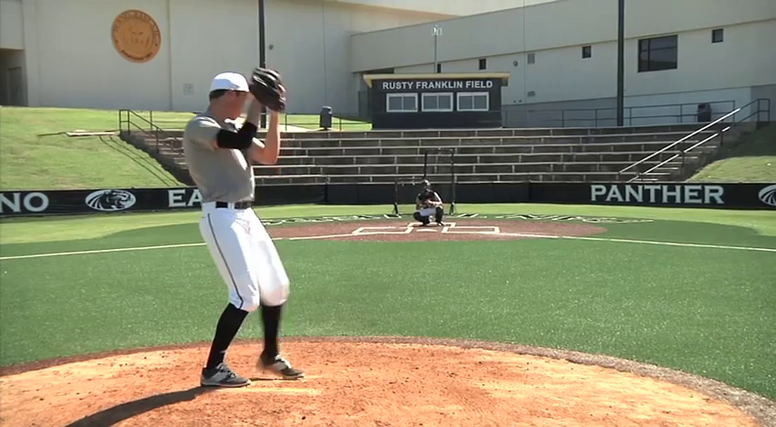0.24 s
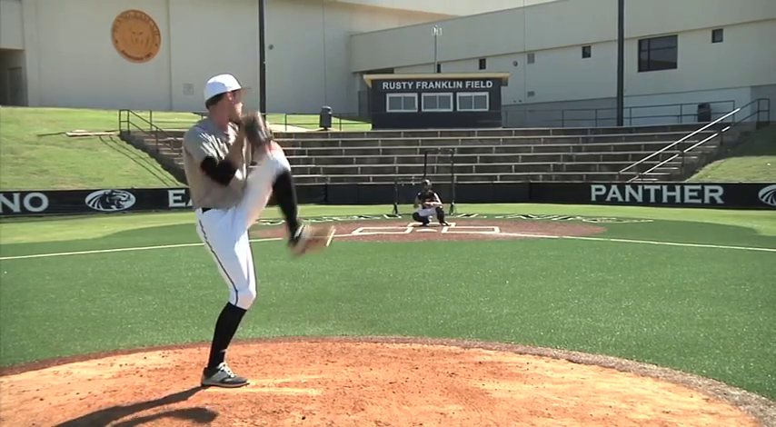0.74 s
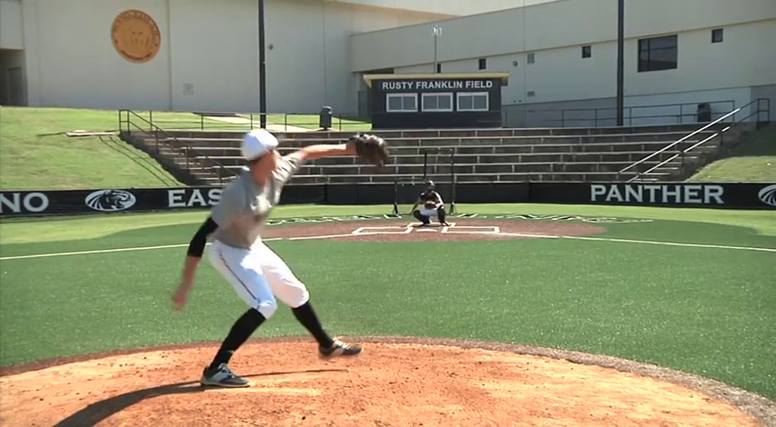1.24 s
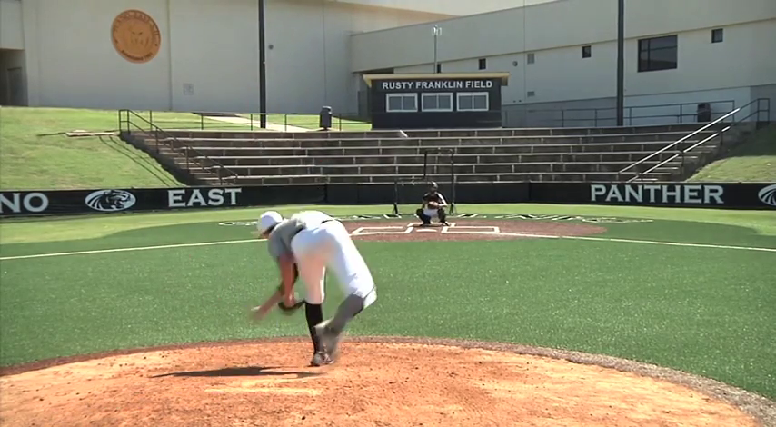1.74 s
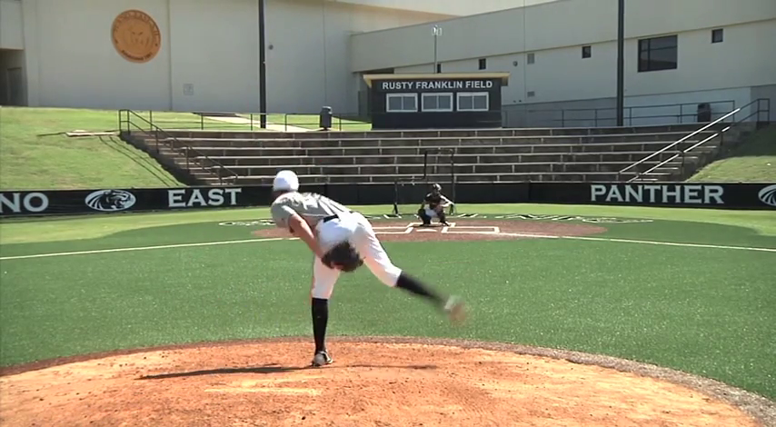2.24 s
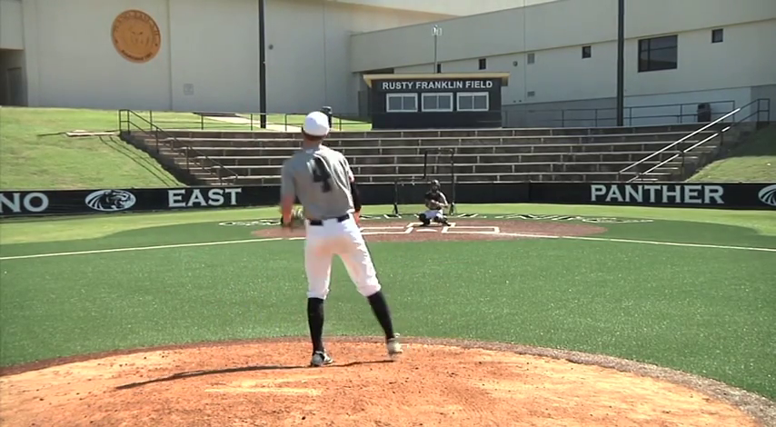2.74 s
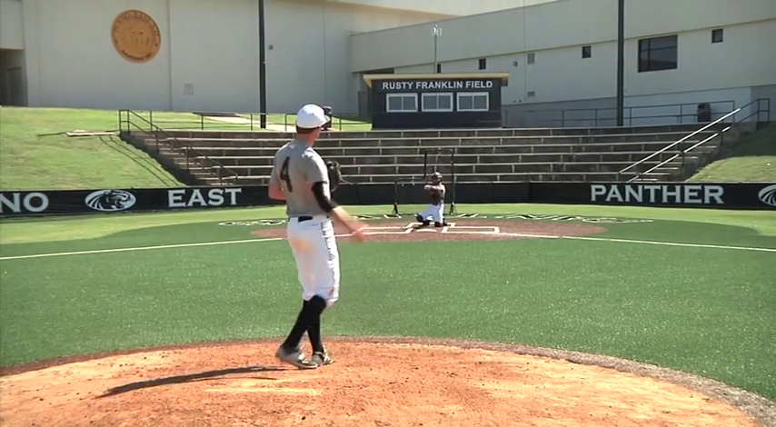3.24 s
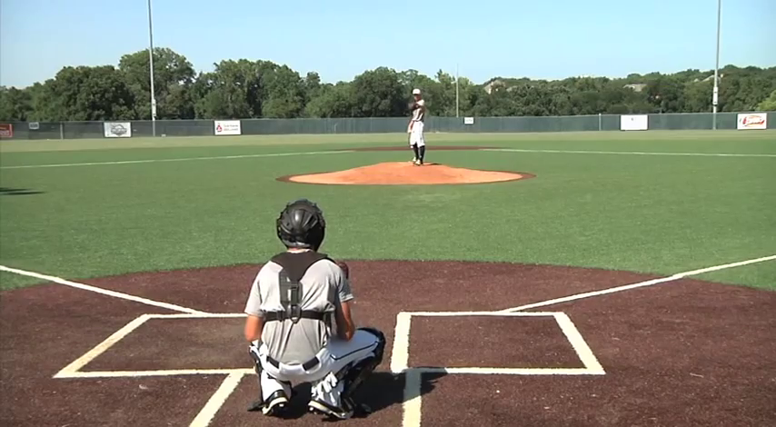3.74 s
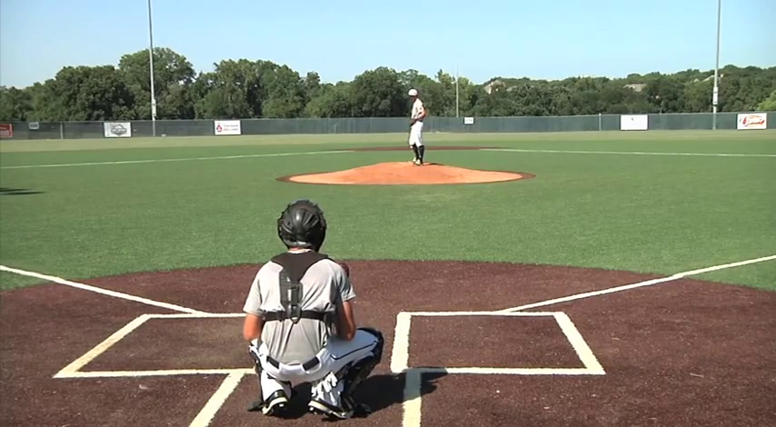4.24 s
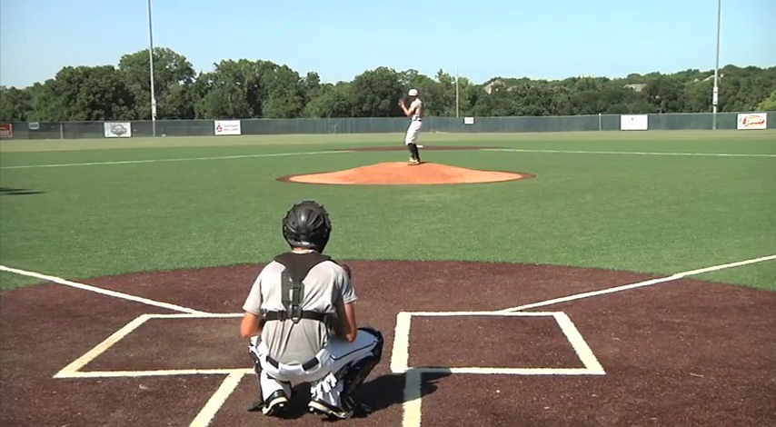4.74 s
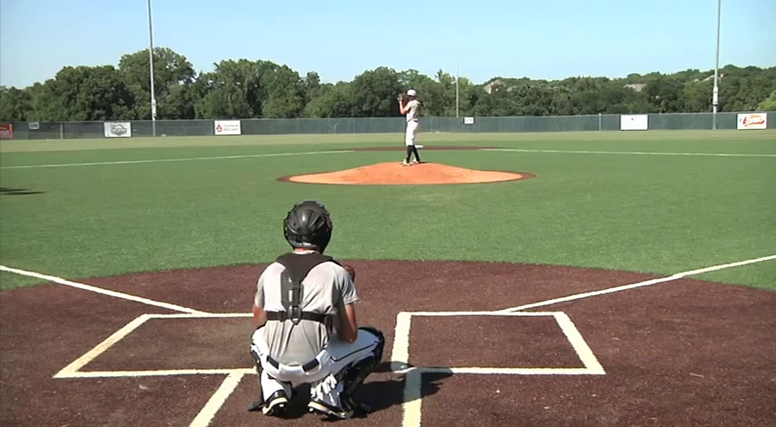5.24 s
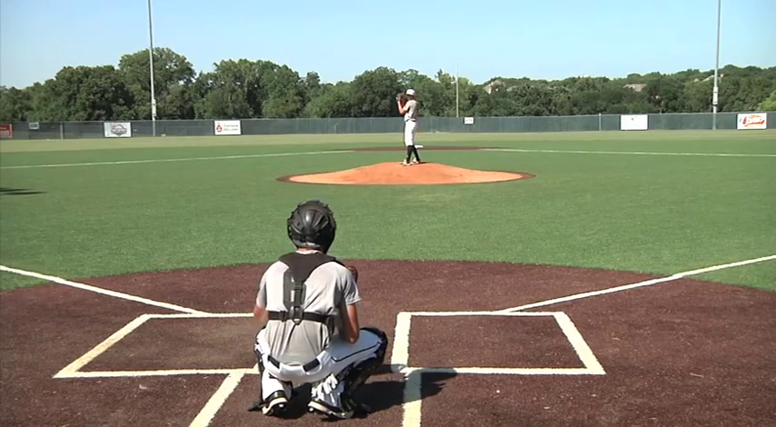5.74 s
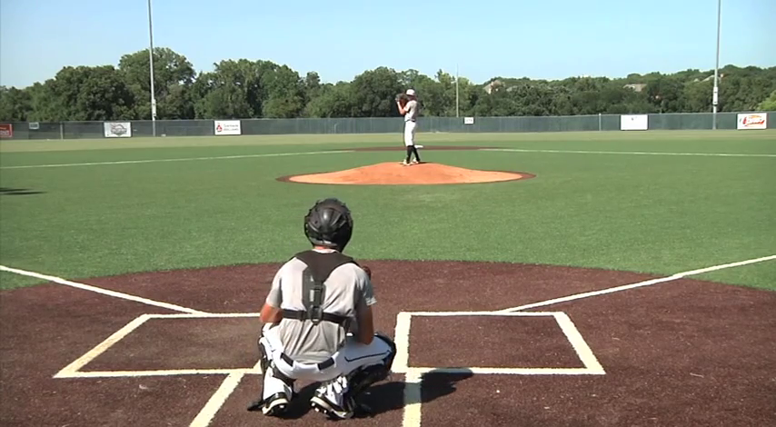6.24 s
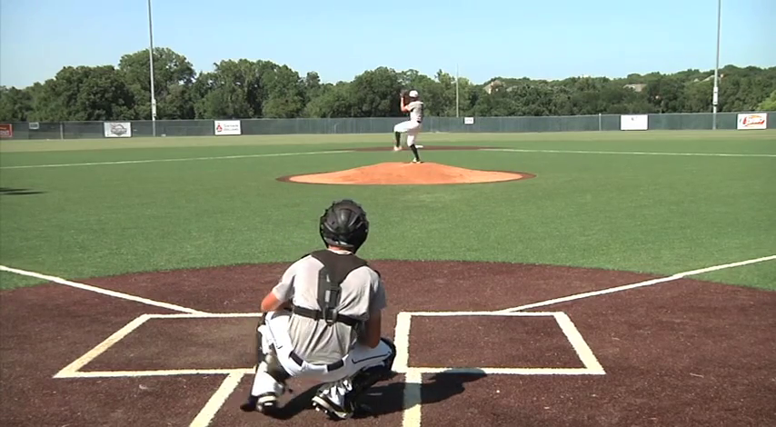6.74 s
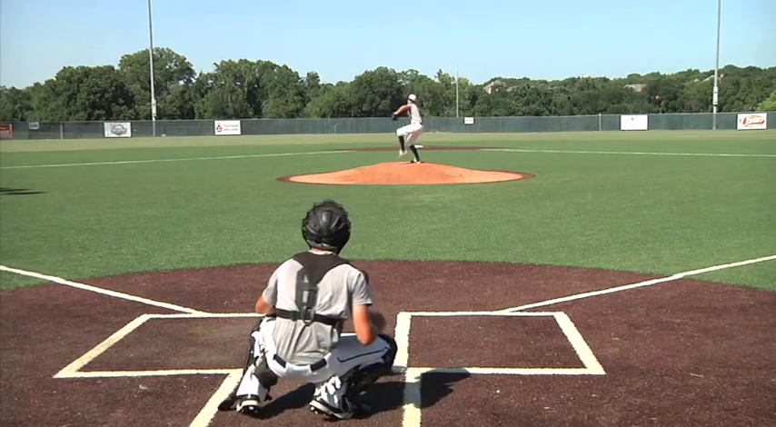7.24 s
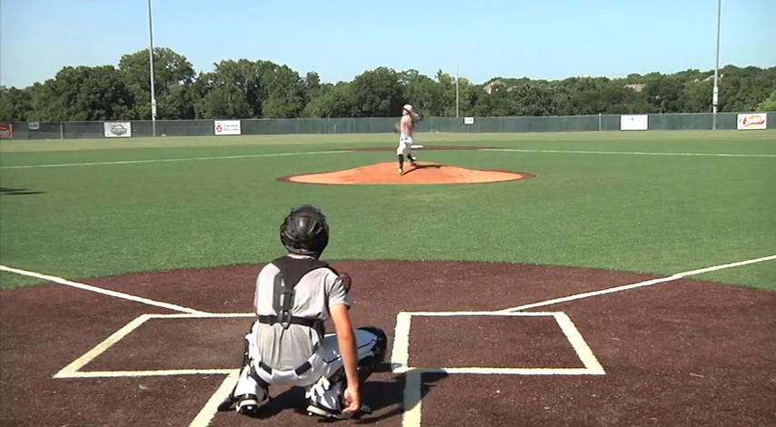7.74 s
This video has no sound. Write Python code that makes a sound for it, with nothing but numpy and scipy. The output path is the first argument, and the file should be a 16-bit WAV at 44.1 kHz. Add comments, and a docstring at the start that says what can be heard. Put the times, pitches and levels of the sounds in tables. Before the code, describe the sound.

Wind rumbles and flutters against the microphone with small dry ticks over a thin, faintly whining outdoor wash. A pitcher's shoes grit and thud on clay, then a hard leather pop rings out with quick slap echoes and a short fading tail. More gritty scraping precedes a click and sudden change of place. Behind the plate there is a soft droning distant wash, a calm spell, then renewed gusts and fine gear scuffs. Nearly mono.

```python
"""Gusty wind buffets a microphone at a ball field: shaped noise held to a limit, with short dry crackles.
Behind the mound: a wash with thin tones, cleats and feet on clay as grains, and a far bird's sliding whistle.
The ball pops into the catcher's mitt, a noise crack over a falling thump; wall, bleachers and building echo it.
A click jumps the sound to behind the plate: a wash of distant traffic and trees with a drone,
more gusts, and showers of finer grains as the catcher's gear scuffs."""
import sys
import numpy as np
from scipy import signal
from scipy.fft import rfft, irfft, next_fast_len
from scipy.io import wavfile
from scipy.ndimage import uniform_filter1d

SR = 44100
rng = np.random.default_rng(int(sys.argv[2]) if len(sys.argv) > 2 else 0)


def int16_out(signal):
    """Quantize to a 16-bit WAV file."""
    q = np.round(np.clip(np.atleast_2d(signal).T, -1, 1) * 32767)
    wavfile.write(sys.argv[1], SR, q.astype(np.int16))


N = 351918
T = np.arange(N) / SR  # s

# short dry crackles and sharp ticks amid the wind: [t/s, length/s, level/dB before colouring]
CRACKLES = [(.015, .014, -51), (.034, 0.013, -49.5), (0.054, .03, -59), (0.092, .0006, -40),
            (0.132, 0.0056, -49.5), (.151, .018, -51.5), (0.374, .017, -49.5), (0.4, 0.0068, -54),
            (.4235, .0006, -40), (.562, 0.0061, -47), (.738, .007, -51), (.854, .004, -48.5),
            (0.989, 0.0057, -46.5), (1.0057, .0006, -39), (1.034, .003, -51), (1.102, .006, -54.5),
            (1.438, .006, -55), (1.641, .004, -55), (1.837, .003, -49), (2.493, .004, -53),
            (2.5, 0.0054, -47), (2.664, .005, -47), (2.7724, .01, -52), (2.815, 0.014, -50),
            (2.872, 0.013, -49), (3.042, .007, -49), (3.234, .004, -54), (3.3717, .004, -47.5),
            (7.8447, .005, -53), (7.9443, 0.0062, -49)]
WIND_LIMIT, CEILING = .39, .48  # limits of the wind pressure and of the whole sound, full scale = 1
MOVE_S = 3.443  # from the mound to the plate


def amp(db):
    """Decibels to gain."""
    return 10 ** (np.asarray(db) / 20)


def unit(x):
    """Scales to an rms of one."""
    return x / np.sqrt(np.mean(x ** 2) + 1e-20)


def read(points, hz):
    """Reads a spectrum along log frequency."""
    f, value = np.transpose(points)
    return np.interp(np.log(hz + 1), np.log(f + 1), value)


def add(mix, s, sound):
    """Mixes a sound in at a time, cut off at the end of the mix."""
    part = mix[round(s * SR):][:len(sound)]
    part += sound[:len(part)]


def colour(x, spectrum, tilt_db=0):
    """Filters a signal by a spectrum, tilted by about so many dB an octave."""
    hz = np.fft.rfftfreq(len(x), 1 / SR)
    gain_db = read(spectrum, hz) + tilt_db * np.log2(hz / 1000 + .1)
    return irfft(rfft(x) * amp(gain_db), len(x))


def noise(spectrum, peaks=(), width_hz=14):
    """Steady noise of a given spectrum, with narrow resonances if any, rms one."""
    size = next_fast_len(N)
    hz = np.fft.rfftfreq(size, 1 / SR)
    db = read(spectrum, hz)
    for centre, rise in peaks:
        db = db + rise / (1 + ((hz - centre) / width_hz) ** 2)
    return unit(irfft(rfft(rng.standard_normal(size)) * amp(db), size)[:N])


def steadied(x, seconds):
    """Evens out the slow swells of a noise."""
    power = abs(uniform_filter1d(x ** 2, int(seconds * SR) + 1))
    return x / np.sqrt(power + 1e-6)


def flatten(x, ceiling):
    """Rounds peaks off against a ceiling."""
    return x / (1 + (x / ceiling) ** 20) ** (1 / 20)


def wind(buffet_db=4.0, eddies_db=1.5, lump_db=1.5):
    """Large slow eddies push on the microphone; small ones flutter above them; both come in lumps."""
    # wind on the microphone: [t/s, buffeting level/dB, small-eddy level/dB], both before trim
    gusts = [(0, -13, -28.5), (0.24, -22, -47.5), (0.36, -17, -33.5), (0.5, -19.5, -38), (0.8, -18.5, -26),
             (1.55, -20.5, -26), (2.12, -20.5, -28), (2.28, -28, -36), (2.43, -30, -39), (2.5, -20, -30.5),
             (2.6, -24, -38), (2.8, -18, -31.5), (3.0, -21.5, -31.5), (3.4, -21, -24.5),
             (3.52, -22.5, -39.5), (3.69, -20.5, -36.5), (3.8, -28.5, -47), (4.03, -27.5, -47),
             (4.13, -22, -44), (4.4, -31, -43), (4.53, -27, -49), (4.64, -22, -45), (4.78, -34.5, -47),
             (5.05, -39.5, -46), (5.4, -36.5, -47.5), (5.7, -41.5, -46.5), (6.38, -40, -46.5),
             (6.67, -27, -30.5), (6.76, -30, -38.5), (7.05, -29.5, -49), (7.22, -29, -42),
             (7.31, -21, -35.5), (7.45, -25, -35.5), (7.98, -19, -36)]
    # spectrum of the large eddies: [f/Hz, relative level/dB per Hz]
    buffet = [(3, -8.5), (10, 3.5), (28, -1), (50, -8.5), (70, -23), (100, -25), (160, -41), (400, -79),
              (1500, -120)]
    # spectrum of the small eddies: [f/Hz, relative level/dB per Hz]
    eddies = [(30, -23), (60, 5.5), (80, -2), (120, -6), (160, -12), (240, -20), (400, -34), (1000, -51.5),
              (4000, -103.5)]
    # how the wind comes in lumps: [swell rate/Hz, relative level/dB]
    lumps = [(1, -18), (4, -0.5), (9, -0.5), (25, -38), (100, -120)]
    s, push_db, flutter_db = np.transpose(gusts)
    push = steadied(noise(buffet), 0.135) * amp(np.interp(T, s, push_db) + buffet_db)
    flutter = steadied(noise(eddies), .12) * amp(np.interp(T, s, flutter_db) + eddies_db)
    return (push + flutter) * amp(lump_db * noise(lumps))


def shoved(pressure, shove_s=0.0069, shove_share=.7):
    """At each crackle the wind pressure is pushed to its limit, on whichever side of zero it already is."""
    for s, length, _ in CRACKLES:
        middle = s + length / 2
        grip = min(shove_share, 1) * np.exp(-np.minimum(((T - middle) / shove_s) ** 2, 50))
        target = np.copysign(CEILING, np.interp(middle, T, pressure))
        pressure = pressure + grip * (target - pressure)
    return flatten(pressure, WIND_LIMIT)


def ticks(pressure, crackle_db=0.0, grain_db=4, fade_db=-9, ticks_per_s=200, tick_db=-42):
    """Each crackle is dry and short; random ticks come more often the harder the wind pushes."""
    # spectrum of ticks and crackles: [f/Hz, gain/dB]
    tick_colour = [(300, -4), (2200, 6), (8000, -4), (16000, -6.5)]
    chance = ticks_per_s * (pressure / WIND_LIMIT) ** 2 / SR  # per sample
    out = amp(tick_db) * rng.standard_normal(N) * (rng.random(N) < chance)
    t = T[:SR // 20]
    for s, length, db in CRACKLES:
        grains = rng.standard_normal(len(t)) * amp(grain_db * np.minimum(rng.exponential(1, len(t)), 4))
        burst = grains * amp(fade_db * t / length) * np.clip(2 - 2 * t / length, 0, 1)
        add(out, s, amp(crackle_db + db) * burst * np.sqrt(length * SR) / np.linalg.norm(burst))
    return colour(out, tick_colour)


def mound_air(mound_db=2.5):
    """Open air behind the mound: an uneven distant wash, with faint ringing bands."""
    # level of the wash: [t/s, level/dB before trim]
    mound_level = [(0, -45), (.08, -53.5), (.22, -53), (.3, -51), (.8, -49.5), (1.12, -55.5), (1.42, -44.5),
                   (1.63, -46), (1.75, -44), (1.85, -47), (1.95, -44.5), (2.25, -44), (2.53, -48),
                   (2.62, -45), (2.9, -52), (3.43, -45.5)]
    # spectrum of the wash: [f/Hz, relative level/dB per Hz]
    mound_spectrum = [(150, -5), (280, -2.5), (520, -1.5), (800, -5.5), (1150, -8.5), (1500, -12),
                      (1850, -16.5), (2400, -17.5), (3000, -17), (3600, -20.5), (4600, -26.5),
                      (7600, -32.5), (9500, -43.5), (16000, -62)]
    # faint ringing bands in the air by the building: [f/Hz, rise above the wash/dB]
    whine = [(528, 3.5), (1066, 4), (1755, 8), (1814, 5.5), (2105, 9.5), (2283, 2), (2401, 11), (2869, 9),
             (3101, 9.5), (3219, 7), (3510, 6), (3569, 9)]
    level = amp(mound_db) * amp(np.interp(T, *np.transpose(mound_level)))
    return (T < MOVE_S) * noise(mound_spectrum, whine, width_hz=7.8) * level


def hum(waver_share=.0007):
    """Thin, slightly wavering tones heard only on the mound."""
    # clean tones by the building: [f/Hz, rms level/dB]
    tones = [(528, -62.5), (1066, -69), (3101, -79.5), (3510, -75), (3569, -73.5)]
    drift = noise([(1, 0), (5, -6), (20, -40), (80, -120)])
    clock = np.cumsum(1 + waver_share * drift) / SR  # s, running a little fast and slow
    total = sum(amp(db) * np.sqrt(2) * np.sin(2 * np.pi * hz * clock) for hz, db in tones)
    return (T < MOVE_S) * total


def scrape(length, db, tilt_db, spectrum, grain_db, clump_db, clump_s=0.0027, peak_share=0.29):
    """A clumped shower of tiny grains that swells and fades."""
    t = T[:SR // 2]
    clumps = unit(uniform_filter1d(rng.standard_normal(len(t)), int(clump_s * SR) + 1))
    grain_level = amp(grain_db * np.minimum(rng.exponential(1, len(t)), 4) + clump_db * clumps)
    grains = rng.standard_normal(len(t)) * grain_level
    stroke = np.interp(t / length, [0, min(peak_share, .9), 1], [0, 1, 0]) ** .65
    return amp(db) * steadied(unit(colour(grains, spectrum, tilt_db)), length) * stroke


def cleats():
    """The pitcher's cleats scrape coarse grains of clay."""
    # scrapes: [t/s, length/s, level/dB before the swell, brightness/dB an octave]
    scrapes = [(0.261, .09, -53.5, 0.5), (1.407, 0.0061, -42, 1), (1.511, .005, -45, 6),
               (1.518, .005, -41, 5), (1.521, 0.04, -42.5, 4), (1.549, 0.011, -35, 1),
               (1.545, 0.076, -38.5, 4), (1.66, 0.037, -48, 5), (1.681, 0.095, -49, 3),
               (1.73, .006, -41, 3), (3.285, 0.0038, -32.5, -5.5), (3.291, 0.0054, -31.5, -5),
               (3.295, 0.061, -48.5, -5), (3.324, 0.027, -39.5, -8)]
    # spectrum of the clay grains: [f/Hz, relative level/dB per Hz]
    grit = [(200, -37), (700, 4.5), (1500, 9), (3000, 3), (4500, -5.5), (7700, -14.5), (9500, -24),
            (12000, -41), (16000, -60)]
    out = np.zeros(N)
    for s, *stroke in scrapes:
        add(out, s, scrape(*stroke, grit, grain_db=8, clump_db=2.5))
    return out


def bird(waver_hz=30, rise_s=0.046, fade_db=-12, drop_hz=419, settle_s=.075):
    """A far bird's thin whistle swells, sinks to its closing pitch and fades."""
    # whistles: [t/s, length/s, closing pitch f/Hz, peak level/dB before the fade]
    whistles = [(1.073, 0.21, 6530, -72), (2.70, 0.35, 6660, -65)]
    out = np.zeros(N)
    for s, length, hz, db in whistles:
        t = T[:int(length * SR)]
        waver = waver_hz * noise([(1, -3), (80, -17.0), (400, -38.5)])[:len(t)]
        pitch = hz + drop_hz * np.exp(-t / settle_s) + waver
        ends = np.minimum(np.minimum(t, length - t) / rise_s, 1)
        level = amp(db + fade_db * (t / length) ** 2) * ends
        add(out, s, level * np.sin(2 * np.pi * np.cumsum(pitch) / SR))
    return out


def steps(step_t60=0.044, step_rise_s=0.0012):
    """Feet land on the clay, each a short dull crunch of noise dying away."""
    # footfalls: [t/s, level/dB before rise and decay]
    footfalls = [(1.539, -23), (1.552, -26), (1.66, -25.5)]
    # spectrum of the crunch: [f/Hz, relative level/dB per Hz]
    clay = [(150, -1), (350, 1), (700, 4), (1020, 0), (1400, -20), (3000, -22), (8000, -42)]
    out, t = np.zeros(N), T[:SR // 2]
    for s, db in footfalls:
        press = amp(db - 60 * t / step_t60) * (1 - np.exp(-t / step_rise_s))
        crunch = unit(colour(rng.standard_normal(len(t)), clay))
        add(out, s, press * steadied(crunch, step_t60 / 2))
    return out


def pop(pocket_db=-3.5, pocket_s=0.0045, crack_t60=0.011, rise_s=0.00028, damping_s=0.0057):
    """The ball slaps the leather: a dry crack over a thump that drops in pitch as the pocket gives."""
    # leather on leather: [f/Hz, gain/dB]
    crack_colour = [(300, -6), (1100, 4), (1350, 12), (1900, 15), (2600, 18.5), (3350, 19.5), (3900, 1),
                    (4400, 9.5), (5500, 2.5), (7300, 3.5), (10000, -4), (13500, -18), (16000, -21)]
    # the mitt's pocket: [f/Hz, gain/dB]
    pocket_colour = [(120, -2), (250, 5), (440, -7.5), (600, -3.5), (800, 4.5), (1100, -4.5), (2000, -8)]
    taut_hz, slack_hz, give_s = 869, 226, 0.0024
    t = T[:SR // 20]
    hz = slack_hz + (taut_hz - slack_hz) * np.exp(-t / give_s)
    pocket = amp(pocket_db) * np.exp(-(t / pocket_s) ** 2) * np.sin(2 * np.pi * np.cumsum(hz) / SR)
    burst = rng.standard_normal(len(t)) * amp(-60 * t / crack_t60) * (1 - np.exp(-t / rise_s))
    even = irfft(np.exp(1j * np.angle(rfft(burst))), len(t))  # same strength at every frequency
    crack = colour(even, crack_colour) * np.exp(-(t / damping_s) ** 2)  # the hand damps the leather at once
    return crack + colour(pocket, pocket_colour) * np.cos(np.pi / 2 * t / t[-1]) ** 2


def smeared(envelope):
    """The pop scattered by many small surfaces, spread over an envelope."""
    scatter = rng.standard_normal(len(envelope)) * envelope
    return signal.fftconvolve(pop(), scatter / np.linalg.norm(scatter))


def field_tail():
    """Scatter from the whole ground; each band dies at its own rate, the bass slowest."""
    # decay over the field: [f/Hz, time to fall 60 dB/s]
    field_t60 = [(150, 1), (600, 0.64), (3000, 0.44), (8000, 0.8), (16000, 0.33)]
    hz, t, z = signal.stft(rng.standard_normal(SR), SR, nperseg=256)
    decay = amp(-60 * t / read(field_t60, hz)[:, None])
    tail = signal.istft(z * decay, SR, nperseg=256)[1]
    return tail / np.linalg.norm(tail)


def catch(pop_db=0.0, tail_db=-14.0, scatter_t60=0.013, wall_db=0.0):
    """The pop, two hard wall slaps and a boom, a flutter off the bleachers, a building smear and a faint tail."""
    # echoes off the backstop wall: [t/s, level/dB before colouring, top edge f/Hz]
    wall_slaps = [(2.3451, -9.5, 6500), (2.3533, -9.5, 12500)]
    # what the wall returns: [f/Hz, gain/dB]
    wall_colour = [(100, -10), (340, 6.5), (550, -5), (850, -17), (1300, -9), (1800, -7), (2400, -2),
                   (3100, 2.5), (4400, 2.5), (9000, 2), (16000, -6)]
    # one echo a row of bleachers, mostly duller as they go:
    # [t/s, level/dB before colouring, brightness/dB an octave]
    bleachers = [(2.4102, -15.5, 0.5), (2.4157, -19, 0.5), (2.423, -19, 1.5), (2.4291, -17, -1.5),
                 (2.436, -16, -1.5), (2.443, -19.5, -1), (2.4495, -14.5, -3)]
    # what the farther surfaces return: [f/Hz, gain/dB]
    far_colour = [(100, -8), (260, -0.5), (600, -5.5), (900, -1), (1300, 3), (2200, -3), (2700, -4),
                  (3200, -1.5), (4000, -4), (7500, -9), (10000, -17), (16000, -36)]
    catch_s = 2.2928
    boom_hz, boom_db, boom_t60 = 307, -26.5, 0.14  # the wall's low note hangs on after the slaps
    # a soft smear off the building behind, level before colouring
    building_s, building_length_s, building_db = 2.445, 0.073, -18.5
    direct, wall, far = np.zeros((3, N))
    t = T[:SR // 5]
    add(direct, catch_s, amp(pop_db) * pop())
    for s, db, top_hz in wall_slaps:
        slap = signal.lfilter(*signal.butter(5, top_hz, fs=SR), pop())
        add(wall, s, amp(wall_db + db) * slap)
    boom = amp(boom_db - 60 * t / boom_t60) * np.sin(2 * np.pi * boom_hz * t)
    add(direct, wall_slaps[-1][0], boom * (1 - np.exp(-t * boom_hz)))
    for s, db, tilt_db in bleachers:
        echo = colour(smeared(amp(-60 * t / scatter_t60)), [(1000, 0)], tilt_db)
        add(far, s, amp(db) * echo[:len(t)])
    smear = smeared(np.sin(np.pi * np.minimum(t / building_length_s, 1)))
    add(far, building_s, amp(building_db) * smear)
    add(far, wall_slaps[0][0], amp(tail_db) * signal.fftconvolve(pop(), field_tail()))
    return direct + colour(wall, wall_colour) + colour(far, far_colour)


def jump(jump_db=-16, settle_s=0.0017):
    """One click, a step that dies away, as the sound jumps to the plate."""
    return -amp(jump_db) * (T >= MOVE_S) * np.exp(-abs(T - MOVE_S) / settle_s)


def plate_air(plate_db=-38, swell_db=.5):
    """Distant traffic and trees from behind the plate: a wash, steady but for a slow swell, with a drone."""
    # spectrum of the wash: [f/Hz, relative level/dB per Hz]
    plate_spectrum = [(60, -20), (130, -3), (200, -0.5), (330, -3), (550, -6.5), (850, -9.5), (1200, -13.5),
                      (1550, -21), (2050, -25), (2900, -25), (3700, -30), (5600, -41.5), (7400, -41.5),
                      (9800, -55), (11500, -58.5), (16000, -57)]
    # a distant drone beyond the outfield: [f/Hz, rise above the wash/dB]
    drone = [(198, 5.5), (222, 5.5), (252, 3), (292, 4), (440, 10.5)]
    swell = noise([(.5, 0), (3, -6), (12, -40), (60, -120)])
    wash = noise(plate_spectrum, drone, width_hz=2.94)
    return (T >= MOVE_S) * wash * amp(plate_db + swell_db * swell)


def catcher_gear():
    """The catcher's gear rustles and clacks as he shifts: finer grains than the clay."""
    # rustles and clacks: [t/s, length/s, level/dB before the swell, brightness/dB an octave]
    rustles = [(6.785, .14, -62, 0), (7.675, .02, -58, -3), (7.698, 0.33, -61.5, -1.5),
               (7.866, .004, -49, 0), (7.873, .005, -47, 0), (7.881, .007, -38, 2), (7.878, .075, -53, 0),
               (7.969, .003, -38, -9)]
    # spectrum of the gear: [f/Hz, relative level/dB per Hz]
    gear = [(300, -15), (1500, -2), (3200, 1), (5500, 0), (8000, -1.5), (9500, -15), (11500, -28),
            (16000, -45)]
    out = np.zeros(N)
    for s, *stroke in rustles:
        add(out, s, scrape(*stroke, gear, grain_db=3.5, clump_db=3.5))
    return out


def scene(catch_lean_db=0.5):
    """Nearly mono; the left port is a little more sensitive in the bass, and the pop leans its way."""
    # balance of the ports: [f/Hz, left minus right level/dB]
    lean = [(200, 1.35), (350, 1.4), (700, 0.72), (1400, 0.13), (3000, 0), (8000, 0.6)]
    gusts, mitt = shoved(wind()), catch()
    field = gusts + ticks(gusts) + mound_air() + hum() + cleats() + bird() + steps()
    field = field + jump() + plate_air() + catcher_gear()
    field = field * signal.windows.tukey(N, .001)  # very short fades at both ends
    ports = []
    for side in (1, -1):  # left, right
        heard = field + amp(side * catch_lean_db / 2) * mitt
        ports.append(colour(heard, [(hz, side * db / 2) for hz, db in lean]))
    return np.array(ports)


def record(dry, hiss_db=-84, port_hiss_db=-85, edge_hz=16000):
    """Peaks flatten against the ceiling; faint shared and separate hiss; the band limit."""
    out = flatten(dry, CEILING) + amp(hiss_db) * rng.standard_normal(N)
    out = out + amp(port_hiss_db) * rng.standard_normal(dry.shape)
    low_pass = signal.firwin(511, edge_hz, window=("kaiser", 9), fs=SR)
    return signal.oaconvolve(out, low_pass[None], "same")


dry = scene()
out = record(dry)
int16_out(out)
```